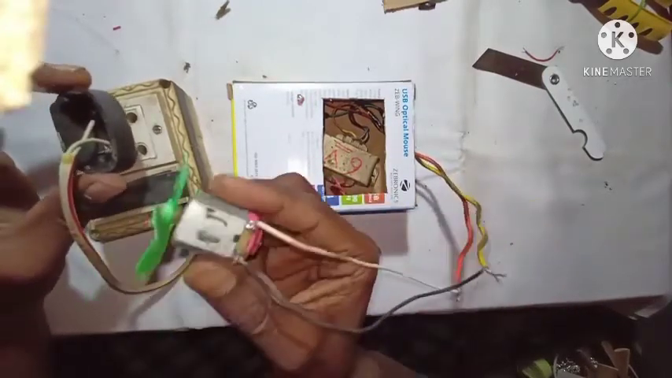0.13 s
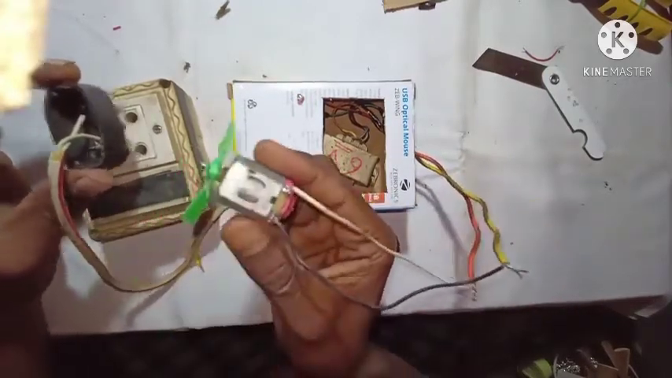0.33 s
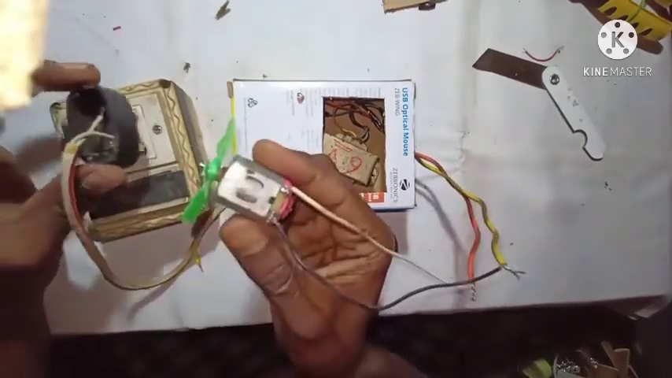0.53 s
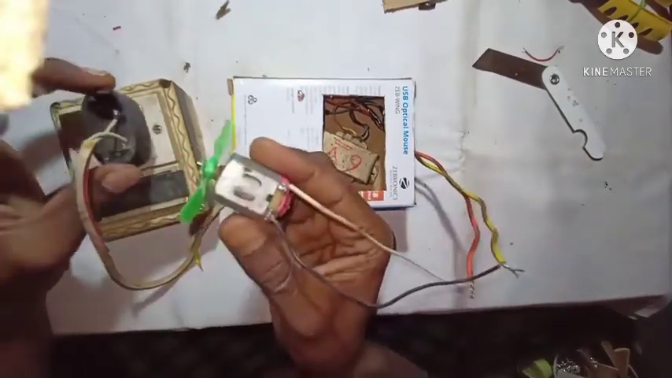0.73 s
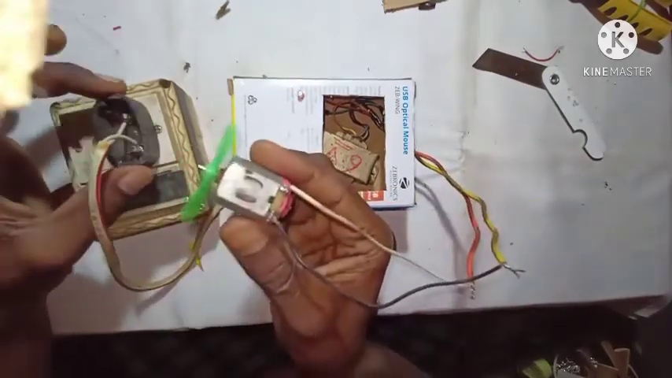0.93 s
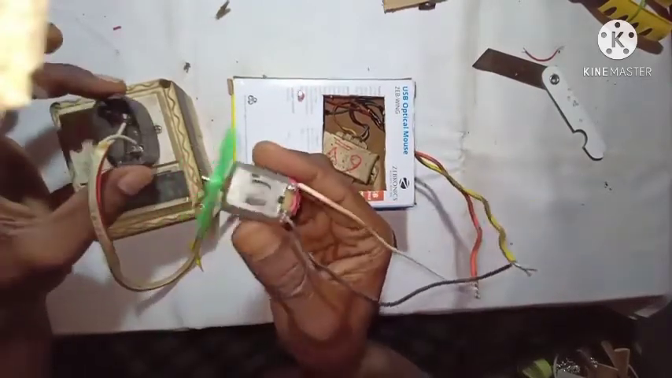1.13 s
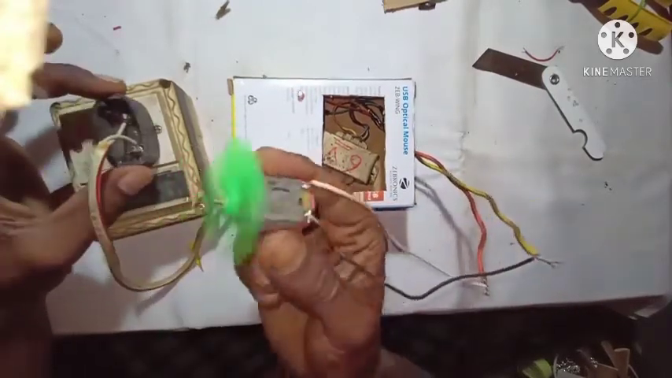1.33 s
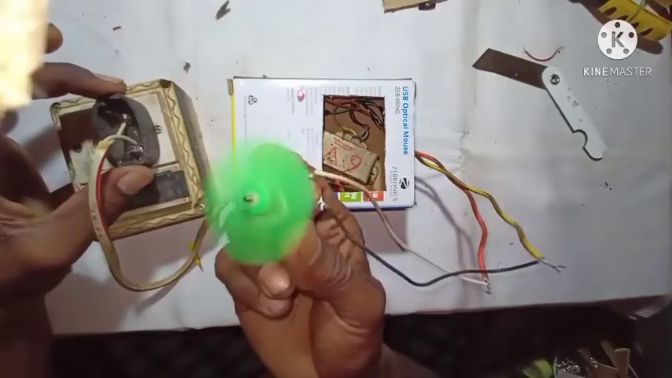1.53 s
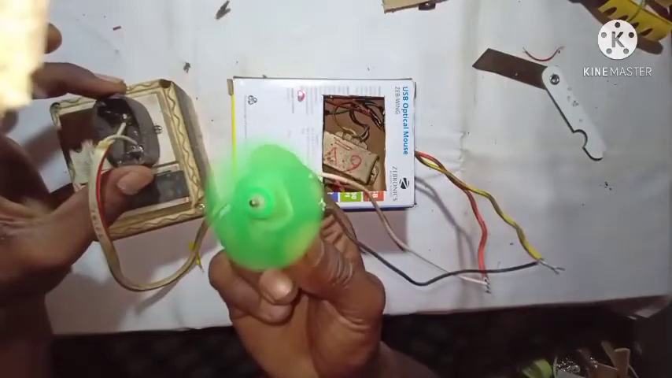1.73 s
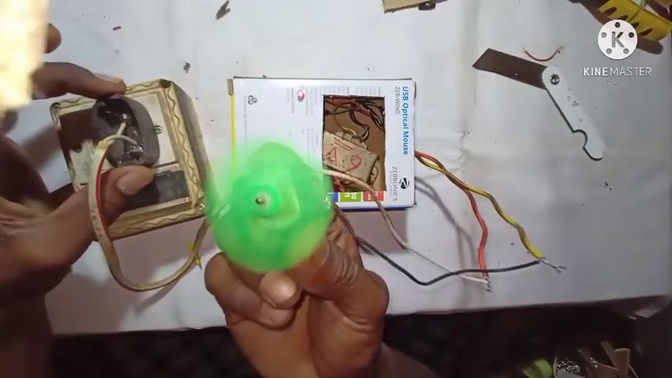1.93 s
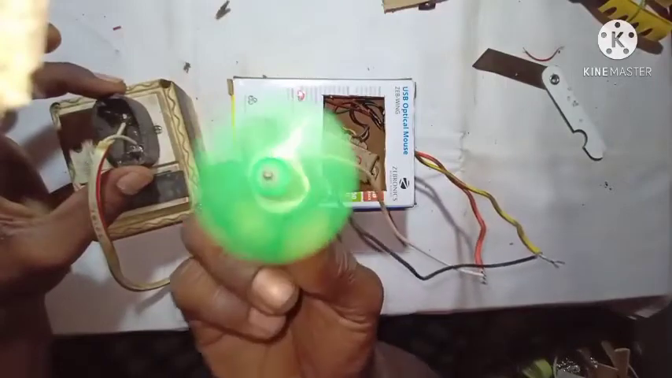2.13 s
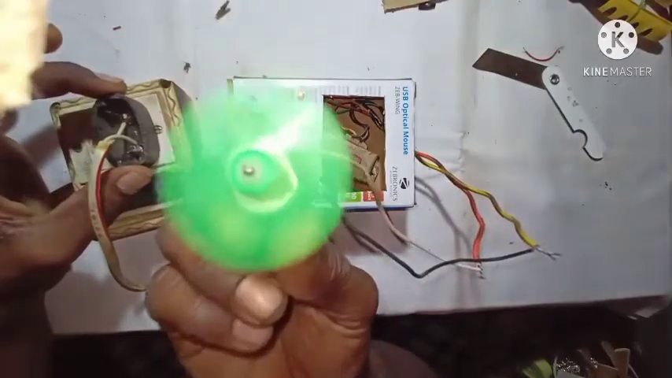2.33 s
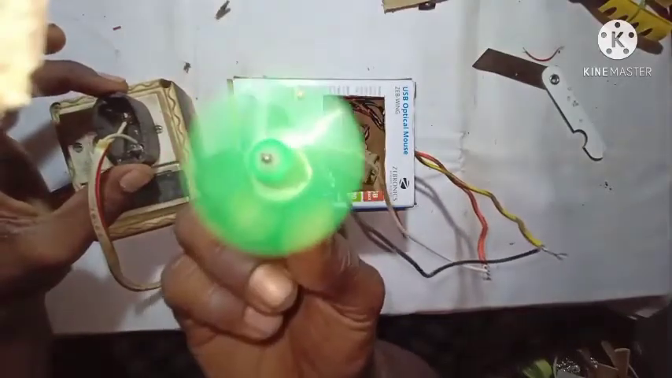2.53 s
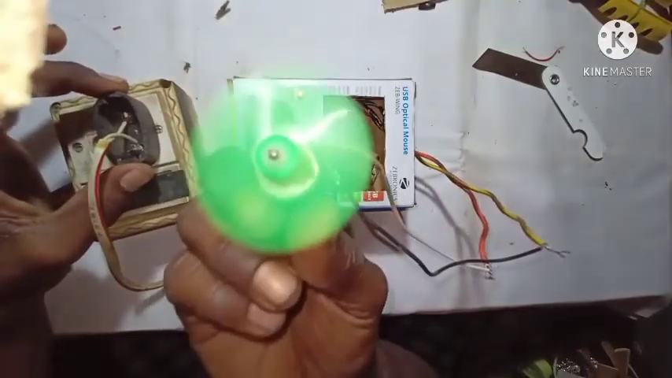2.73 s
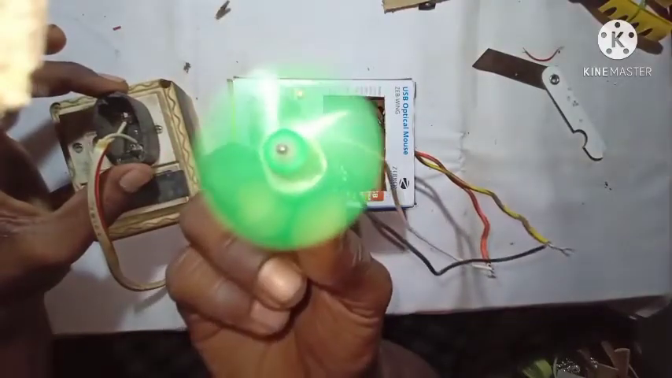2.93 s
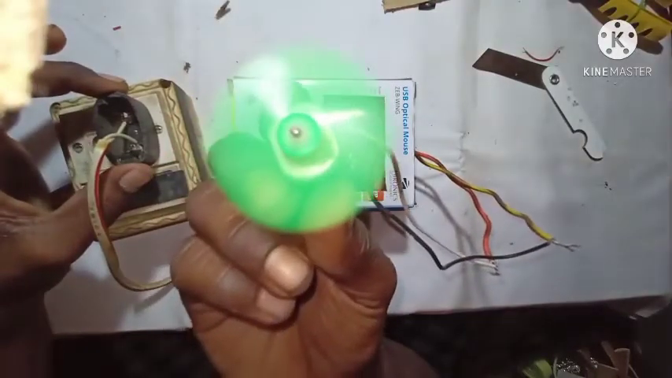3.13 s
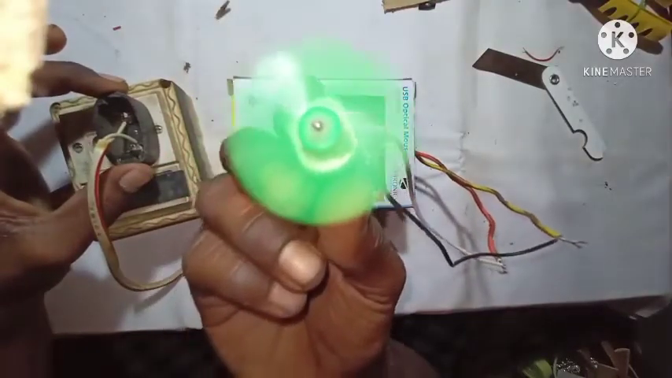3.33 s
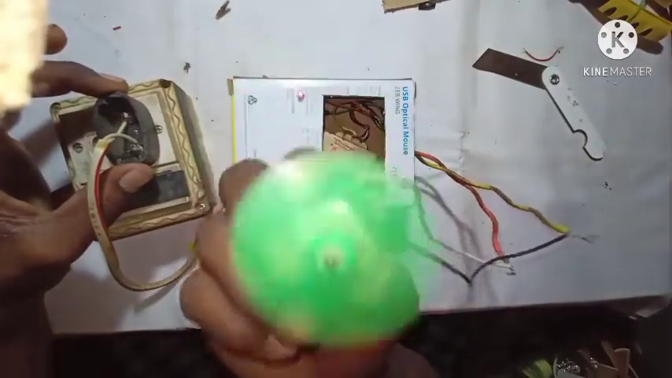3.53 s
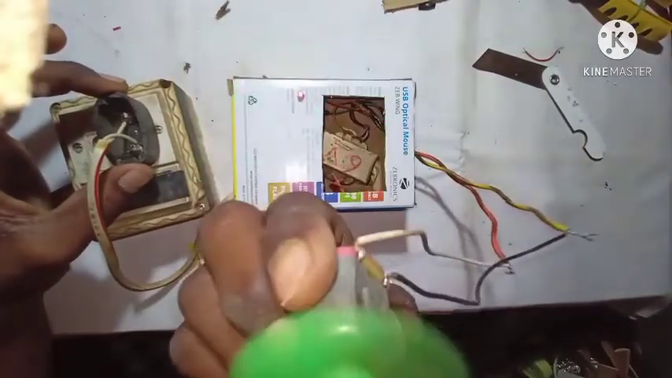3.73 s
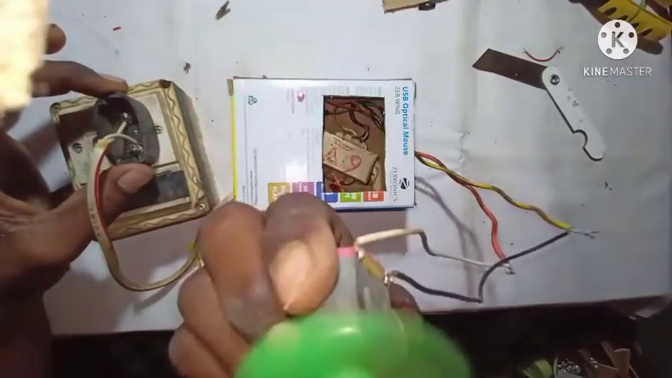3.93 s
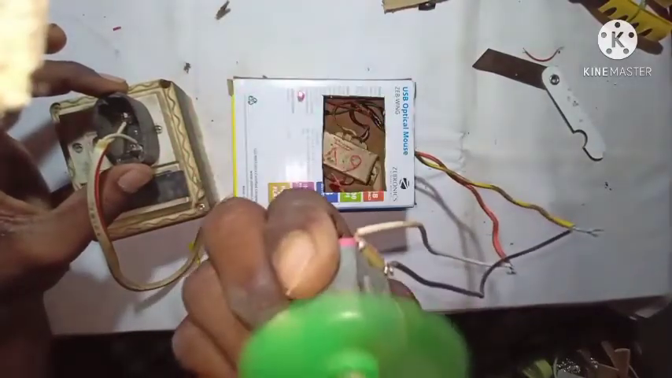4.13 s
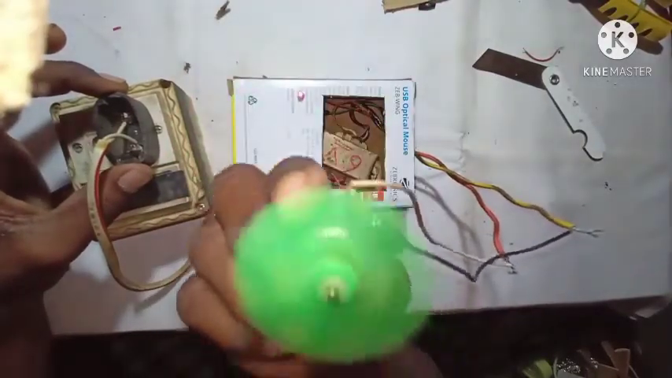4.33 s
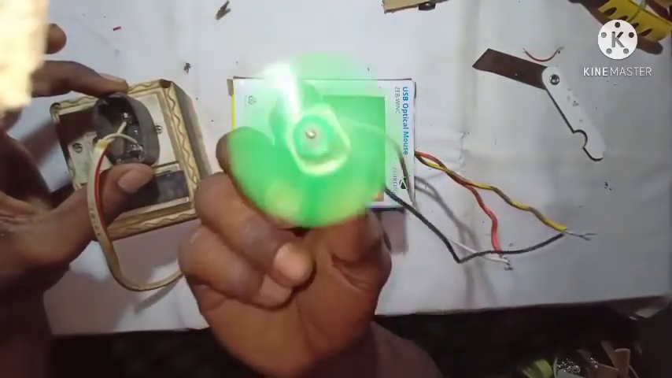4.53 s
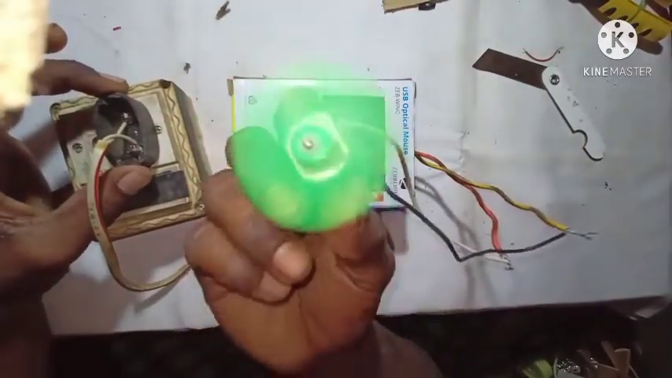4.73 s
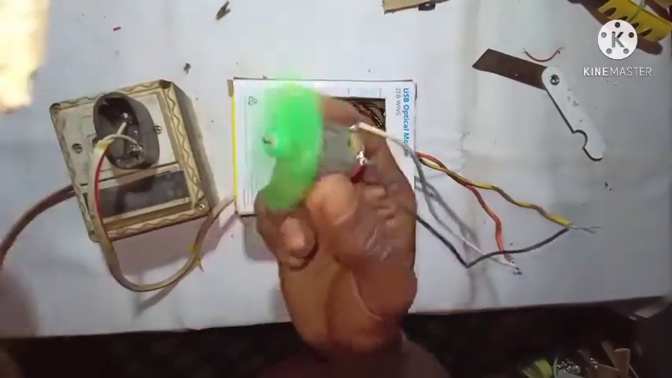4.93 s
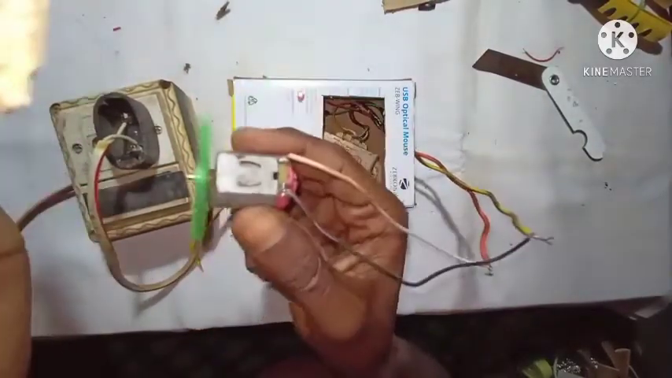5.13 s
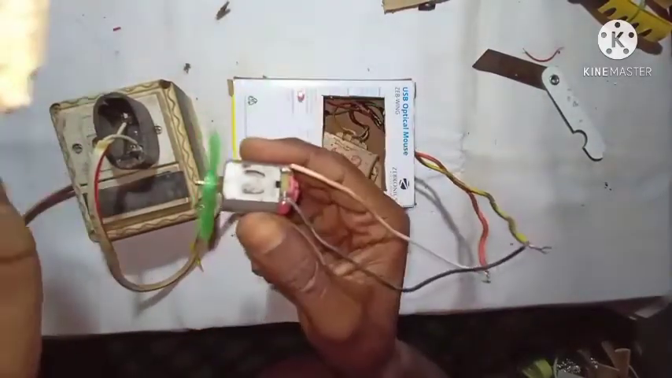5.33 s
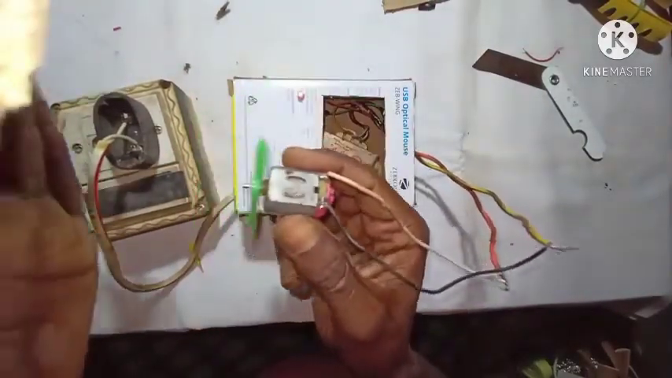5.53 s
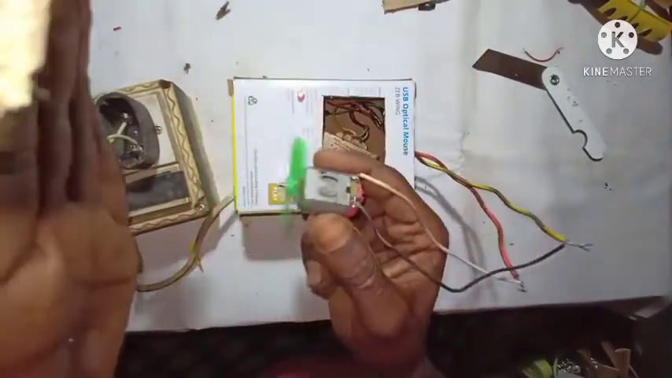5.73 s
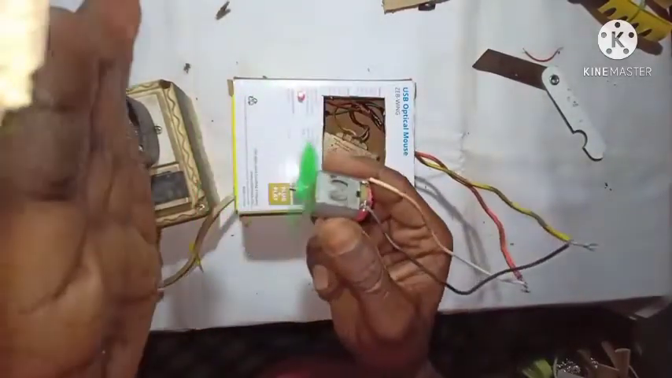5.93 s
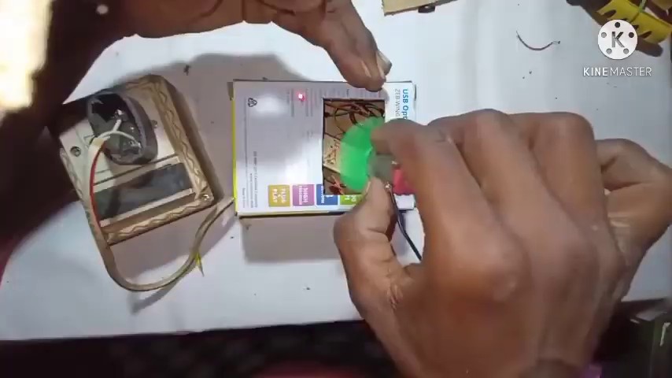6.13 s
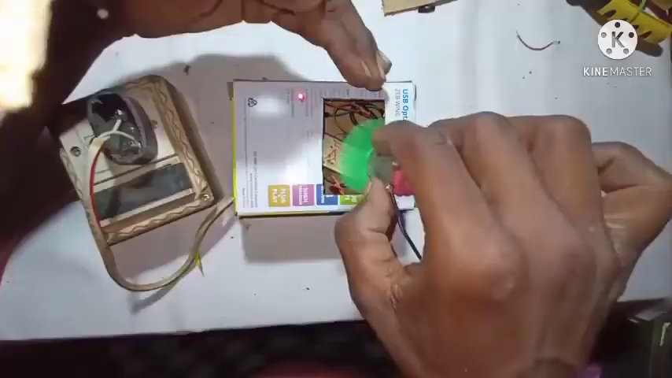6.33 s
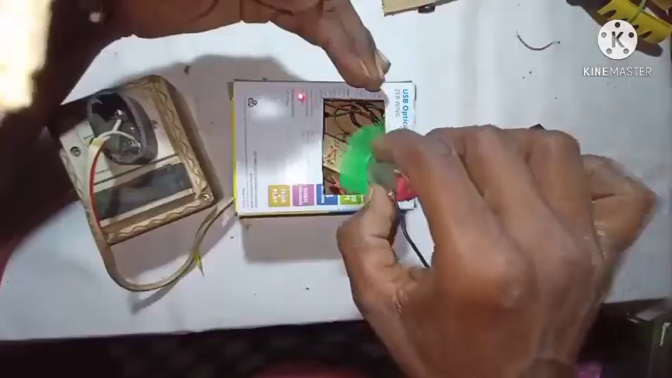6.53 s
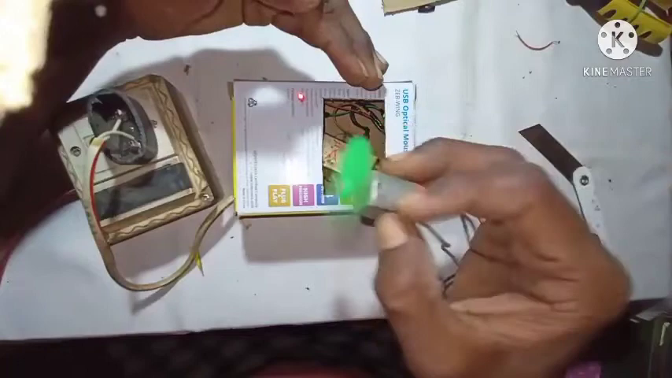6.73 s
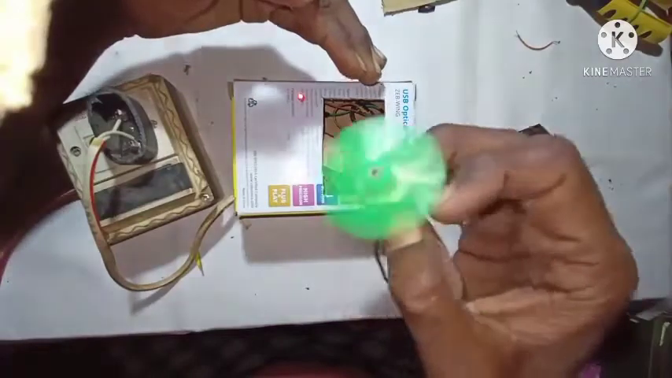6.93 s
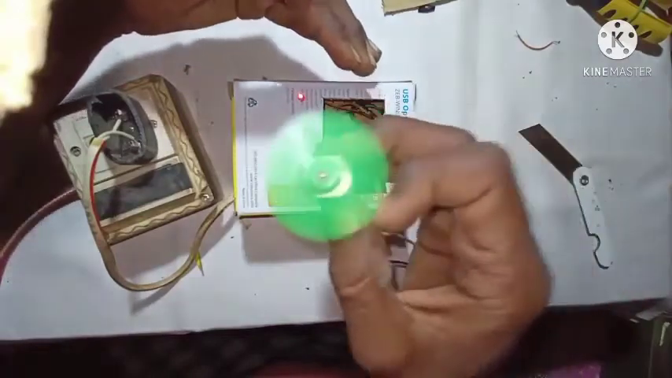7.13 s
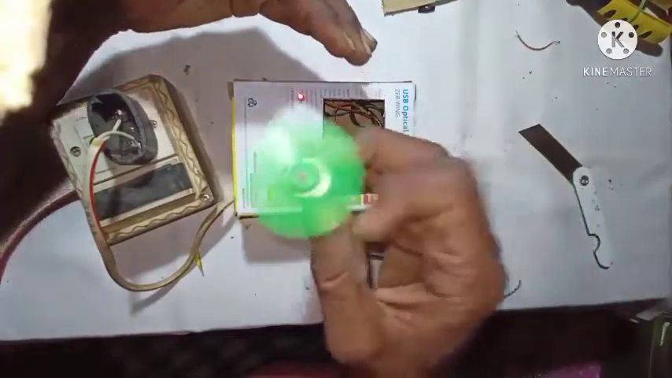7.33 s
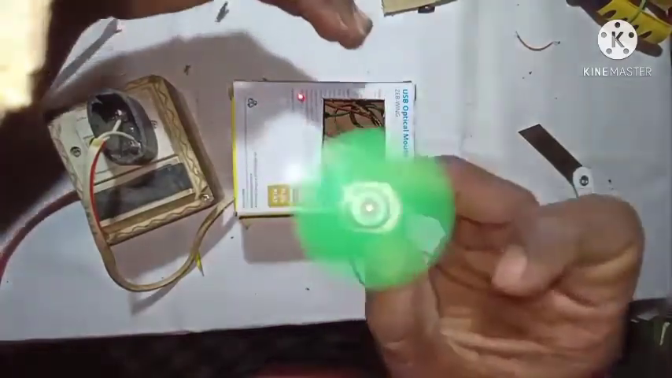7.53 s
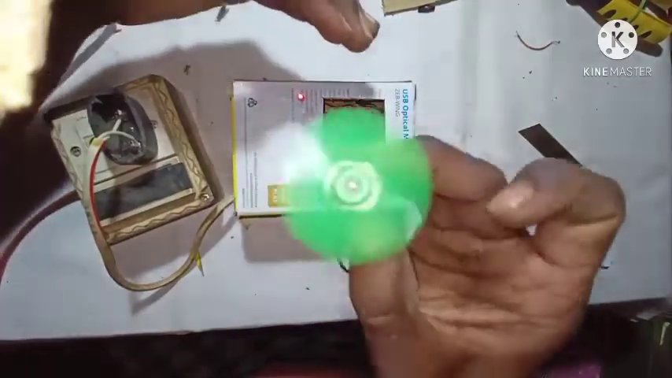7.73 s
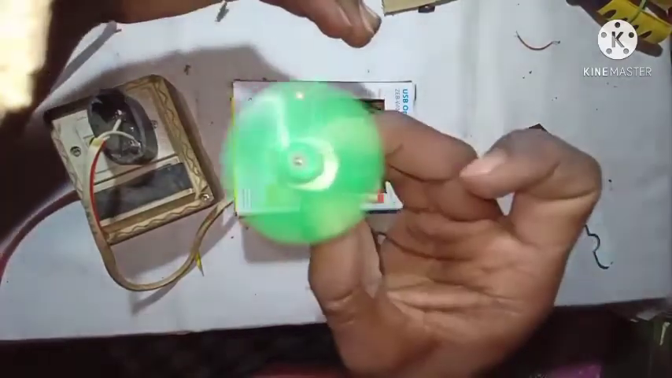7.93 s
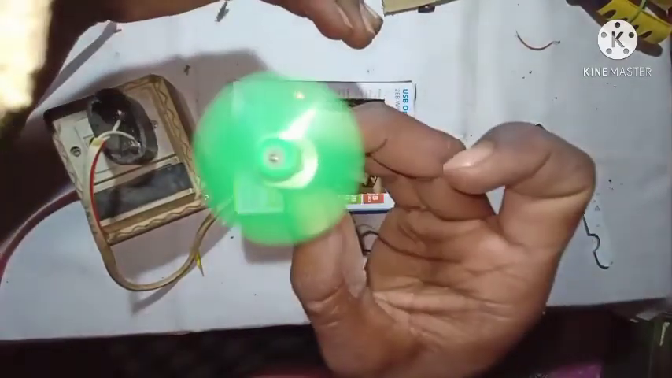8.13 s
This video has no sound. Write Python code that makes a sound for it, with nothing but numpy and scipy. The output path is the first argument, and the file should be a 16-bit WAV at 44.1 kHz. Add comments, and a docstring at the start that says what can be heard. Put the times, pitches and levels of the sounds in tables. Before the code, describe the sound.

A wire clicks into contact and a little fan motor starts whirring indoors, with hissing rasp, shifting pitch and soft air puffs.

```python
"""Dry ticks in a quiet room: a wire touches the supply and a small hand-held DC motor spins up.
Its brushes rasp on the commutator and ring the steel can, while the plastic fan stirs a draught
that now and then puffs against the microphone. The fan slips on its shaft, so the two tones beat
and the hub rubs, until it is pushed home and whines cleanly, grazed and briefly checked by a finger."""
import sys
import numpy as np
from scipy import signal
from scipy.fft import rfft, irfft, next_fast_len
from scipy.io import wavfile
from scipy.ndimage import map_coordinates

SR = 44100
rng = np.random.default_rng(int(sys.argv[2]) if len(sys.argv) > 2 else 0)


def unload_wav(signal):
    """Save mono or channel-first audio to the path in sys.argv[1] as 16-bit WAV at rate SR, clipped to [-1, 1]."""
    wavfile.write(
        sys.argv[1],
        SR,
        np.round(np.clip(np.atleast_2d(signal).T, -1, 1) * 32767).astype(np.int16),
    )


N = 361619


def amp(db):
    """Decibels to gain."""
    return 10 ** (np.asarray(db) / 20)


def unit(x):
    """Scale to rms 1."""
    return x / np.sqrt(np.mean(x ** 2) + 1e-20)


def clock():
    """The time of every sample, in seconds."""
    return np.arange(N) / SR


def along(points, hz):
    """Read (Hz, value) points on a log frequency axis."""
    freqs, values = np.transpose(points)
    return np.interp(np.log(hz + 1), np.log(freqs + 1), values)


def curve(points):
    """An automation line through (time, value) points."""
    return np.interp(clock(), *np.transpose(points))


def after(s, rise):
    """A ramp from 0 to 1 that starts at s."""
    return np.clip((clock() - s) / rise, 0, 1)


def swell(s, db, half_length):
    """A Gaussian envelope that peaks at time s."""
    return amp(db) * np.exp(-((clock() - s) / half_length) ** 2)


def wobble(rate):
    """A smooth random curve, rate knots a second."""
    return map_coordinates(rng.standard_normal(int(N * rate / SR) + 4), [clock() * rate])


def filtered(x, response):
    """x through an EQ given as gain against frequency."""
    size = next_fast_len(N + SR // 2)
    return irfft(rfft(x, size) * response(np.fft.rfftfreq(size, 1 / SR)), size)[..., :N]


def noise(spectrum):
    """Coloured noise of rms 1."""
    return unit(filtered(rng.standard_normal(N), lambda hz: amp(along(spectrum, hz))))


def bell(hz, centre, width):
    """The shape of one resonance, top 1."""
    return 1 / (1 + (2 * (hz - centre) / width) ** 2)


def band(x, lo_hz, hi_hz):
    """The part of x between two soft edges."""
    return filtered(x, lambda hz: 1 / (1 + (hz / hi_hz) ** 10) - 1 / (1 + (hz / lo_hz) ** 10))


def resonate(x, modes):
    """x through resonances and notches."""
    return filtered(x, lambda hz: amp(sum(db * bell(hz, centre, width) for centre, width, db in modes)))


# colour of the quiet room: (frequency [Hz], level [dB])
ROOM_TONE_EQ = [(15, -39), (25, -3), (33, -7), (82, -19), (204, 0.5), (246, -7), (399, -7), (1240, -16),
                (1620, -17), (2850, -24), (15500, -26)]


def room_tone():
    """A faint, dark bed of steady noise."""
    return amp(-83.5) * noise(ROOM_TONE_EQ)


# wire contacts and finger taps: (time [s], snap [dB], clack [dB], thump [dB])
CONTACTS = [(.658, -45, -52, -58), (.67, -47.5, -58, -60), (.907, -45, -49, -60), (.928, -66, -59, -52),
            (.952, -63, -50, -47), (0.969, -62, -41.5, -47), (1.015, -61, -42, -38),
            (1.032, -44, -32.5, -46), (7.392, -46, -56, -72), (7.403, -39.5, -48, -68)]
# colours of the bright snap and the hollow clack: (frequency [Hz], level [dB])
SNAP_EQ = [(100, -28), (700, -17), (1200, 2), (1800, -6), (2300, -3), (2650, 1.5), (3050, 1), (3800, -8.5),
           (8000, -5.5), (15000, -15.5)]
CLACK_EQ = [(100, -29), (400, -3.5), (700, -19), (1000, -4), (1300, 6), (1700, -41), (4000, -26),
            (15000, -34)]


def ticks():
    """Each contact is a dry snap, a plastic clack and a dull thump of the hand-held motor."""
    snap, clack, thump = np.zeros((3, N))
    for s, snap_db, clack_db, thump_db in CONTACTS:
        age = np.maximum(clock() - s, 0)
        snap += (age > 0) * amp(snap_db) * (amp(-60 * age / 0.012) + 0.15 * amp(-60 * age / 0.097))
        clack += (age > 0) * amp(clack_db - 60 * age / 0.032)
        thump += amp(thump_db - 60 * age / 0.083) * np.sin(2 * np.pi * 180 * age)
    return snap * noise(SNAP_EQ) + clack * noise(CLACK_EQ) + band(thump, 130, 600)


# each grip turns other parts of the motor to the microphone, with its own mix and EQ:
# (time [s], glide [s], hum [dB], blade tone [dB], fifth order [dB], brush trim [dB], spark trim [dB],
#  draught [dB], list of (centre [Hz], width [Hz], gain [dB]))
GRIPS = [ (0, 0, -55.5, -60, -73, 1.54, -.7, -62.5, [(1750, 260, 1.5), (3600, 340, 2.5), (5700, 460, 1.5),
         (4900, 970, -4.5), (8600, 790, -3), (9800, 960, 3.5), (11500, 570, -5), (12400, 320, 5)]),
         (2.17, 0.3, -51, -63.5, -72, -.5, -1.5, -61.5, [(2193, 540, -3), (4560, 320, -5),
         (15000, 900, 4)]), (3.7, 0.41, -46.5, -59, -67, -0.16, -1, -62.5, [(2120, 650, -5.5),
         (11300, 800, 3), (12100, 440, 2)]), (4.5, 0.3, -51, -59, -71, 0.6, -2, -60.5, [(6460, 470, -3.5),
         (12000, 600, 3.5)]), (4.94, 0.18, -57, -60, -69, 1.1, 0.6, -60.5, [(3450, 450, 3.5),
         (4870, 380, -4), (12400, 600, 3)]),
         (5.25, 0.39, -50.5, -72.5, -69, -0.6, -1.5, -58.5, [(1510, 280, -6), (2920, 170, -6),
         (3540, 200, 7.5), (4930, 380, -4.5), (5800, 560, 2), (12600, 900, -0.5)]),
         (6.2, 0.17, -45.1, -76, -64, -3.8, 4, -65, [(925, 780, 7), (1500, 490, -6), (2178, 290, 5.5),
         (4900, 1050, -5.5), (6144, 700, 5), (11900, 940, -7)]),
         (6.84, 0.44, -47.3, -53, -59.5, -1.2, 3, -67, [(2690, 870, -4), (4200, 460, 5.5), (5000, 420, -3),
         (7100, 1500, 2.5), (8760, 540, -3), (12250, 410, -2)]),
         (7.24, 0.13, -49, -53.5, -52, -1, 2.5, -65.5, [(1800, 500, -3), (2750, 760, -5.5), (4240, 470, 3),
         (5000, 470, -4), (8800, 540, -3), (12250, 410, 4)]),
         (7.45, 0.051, -45.5, -53, -66.5, -0.64, 0.7, -65.5, [(2500, 1160, -5), (4140, 590, 3.5),
         (9670, 600, 4)]), ]


def glide(values):
    """Crossfade one value or sound per grip as the hand turns the motor."""
    blend = values[0]
    for (s, length, *_), value in zip(GRIPS[1:], values[1:]):
        share = after(s - length / 2, length)
        blend = (1 - share) * blend + share * value
    return blend


POWER_ON_S, STALL_SHARE = .907, 0.21  # current flows; share of the drive left at standstill
RATTLE_DB, HISS_DB, FIZZ_DB = -54, -48.5, -46  # at cruising speed, before the trims
# colour of the raw brush scrape: (frequency [Hz], level [dB])
SCRAPE_EQ = [(120, -18), (250, -3), (500, -0.5), (900, -1), (2200, 1.5), (5000, 1), (9000, -1), (15500, 7)]
# resonances of the steel can: (centre [Hz], width [Hz], gain [dB])
CAN_MODES = [(937, 120, 3.5), (1587, 400, 6.5), (2525, 430, 3), (3270, 470, 6.5), (3960, 920, 4),
             (5594, 410, 5.5), (6840, 170, 3), (7610, 700, 5), (9450, 550, 2), (10620, 320, 2.5),
             (12130, 520, 6), (14840, 770, 7.5)]


def brushes(shaft_angle, pace, brush_db, spark_db):
    """Two brushes scrape and spark over three commutator bars and ring the can; faster is louder."""
    drive = abs(STALL_SHARE + (1 - STALL_SHARE) * pace ** 3.13)
    gaps = np.cos(6 * shaft_angle)  # six gaps a turn
    pressure = amp(2.36 * gaps + 1.5 * np.cos(shaft_angle) + 0.69 * wobble(700) + 0.52 * wobble(25))
    scrape = filtered(pressure * rng.standard_normal(N), lambda hz: amp(along(SCRAPE_EQ, hz)))
    can = resonate(scrape, CAN_MODES)
    held = glide([resonate(can, grip_eq) for *_, grip_eq in GRIPS])
    rattle = amp(RATTLE_DB) * drive ** 0.75 * unit(band(held, 100, 2870))
    hiss = amp(HISS_DB) * drive * unit(band(held, 3104, 9130))
    fizz = amp(FIZZ_DB + spark_db) * drive * unit(band(held, 8760, 15600))
    return (rattle + hiss + fizz) * amp(brush_db + finger_dip_db()) * after(POWER_ON_S, rise=0.018)


def table_reflection(x, delay_s=0.000896, level_db=-14.5):
    """A bounce off the table top; its delay sways with the hand and sweeps a faint comb."""
    delay = delay_s * (1 + .1 * wobble(1.486))
    return amp(level_db) * map_coordinates(x, [(clock() - delay) * SR])


CRUISE_HZ, PUSHED_HOME_S = 380, 6.185
# fan speed while it slips, and once seated: (time [s], rotation [Hz])
LOOSE_SPEED = [(1.5, 379.4), (1.8, 367.9), (2.17, 360.8), (2.32, 339.4), (2.58, 336.8), (2.9, 326.7),
               (3.3, 325.0), (3.6, 317.5), (3.82, 346.8), (4.25, 353.0), (4.87, 348.3), (5.27, 399.7),
               (5.65, 397.7), (6.15, 402.3)]
SEATED_SPEED = [(6.22, 440.6), (6.65, 443.7), (6.92, 384), (7.19, 368), (7.29, 383.3), (7.38, 378.2),
                (7.42, 332.7), (7.55, 381.6), (7.68, 400.4), (7.83, 383), (8.02, 377.7), (8.18, 367.4)]
# how much faster the shaft turns than the loose fan: (time [s], slip [Hz])
SHAFT_SLIP = [(1.1, 90), (1.35, 60), (1.47, 14), (2, 14.5), (2.15, 7.3), (2.6, 8), (3, 9.6), (3.35, 7.3),
              (3.55, 9), (3.68, 25.5), (3.85, 17), (4.33, 17), (4.45, 12), (4.85, 19), (5.05, 56),
              (6.17, 49)]


def rotation():
    """The fan's pace (1 at cruising speed), its angle and the shaft's lead over it, both in radians."""
    seated = after(PUSHED_HOME_S, rise=0.0053)
    spin_up = 1 - (1 - after(.97, rise=.52)) ** 2.7  # gathers speed quickly at first
    fan_hz = (1 - seated) * spin_up * curve(LOOSE_SPEED) + seated * curve(SEATED_SPEED)
    fan_hz *= 1 + 0.00091 * wobble(45)
    lead_turns = np.cumsum(curve(SHAFT_SLIP) * (1 - seated)) / SR
    lead_turns -= np.interp(2.995, clock(), lead_turns)  # one rub of the hub peaks at this time
    return fan_hz / CRUISE_HZ, 2 * np.pi * np.cumsum(fan_hz) / SR, 2 * np.pi * lead_turns


# the jet sweeps across the microphone: (time [s], level [dB], half length [s])
PUFFS = [(1.385, -45, 0.0097), (1.457, -46.5, 0.019), (1.505, -50, 0.016), (5.163, -48, 0.015),
         (5.211, -44, 0.029), (5.271, -54, 0.019), (6.943, -60, 0.017), (7, -48.5, 0.018)]
# colours of the running draught and of the puffs: (frequency [Hz], level [dB])
DRAUGHT_EQ = [(20, -17), (50, -23.5), (85, -13), (125, 1.5), (190, 1), (300, 0.5), (500, -5), (1200, -40),
              (4000, -80)]
PUFF_EQ = [(20, -24), (45, -31), (75, -8), (140, 3.5), (210, 1.5), (300, -2.5), (500, -16), (1200, -38),
           (4000, -80)]


def draught(pace, air_db):
    """The blades stir a rumble that grows with speed, with deeper puffs as their jet hits the mic."""
    rumble = amp(air_db + wobble(9.8)) * pace * noise(DRAUGHT_EQ)
    gusts = sum(swell(*puff) for puff in PUFFS)
    return rumble + gusts * noise(PUFF_EQ)


def orders(angle, levels, flutter_db, rocking=0):
    """Sines at multiples of a rotation; a rocking hub favours odd and even overtones in turn."""
    tone = np.zeros(N)
    for order, db in levels:
        sway = amp(flutter_db * wobble(30)) * (1 - (-1) ** order * rocking) if order > 1 else 1
        tone += np.sqrt(2) * amp(db) * sway * np.sin(order * angle + rng.uniform(0, 2 * np.pi))
    return tone


def hub_rub(lead, looseness):
    """The hub rubs once for every turn the shaft gains; the tighter it binds, the harder it rubs."""
    contact = ((1 + np.cos(lead)) / 2) ** 2
    white = rng.standard_normal(N)
    friction = unit(filtered(white, lambda hz: bell(hz, 5550, 800) + .4 * bell(hz, 3200, 700) + .07))
    return amp(-50.3 - 6.5 * looseness) * contact * friction


def loose_fan(angle, lead, pace, hum_db, blade_db, fifth_db, tight_slip_hz=8.5):
    """The shaft sings just above the slipping fan, so they beat while the hub rocks and rubs."""
    looseness = np.log2(curve(SHAFT_SLIP) / tight_slip_hz)
    # both levels settle at a limit when the hub runs free
    second_db = np.minimum(-71 + 8 * looseness, -64.5)
    shaft_db = np.maximum(-56.5 - 11.5 * looseness, -72.5)
    rocking = .85 * np.cos(lead - 2.1)
    hum = orders(angle, [(1, hum_db)], flutter_db=0) * (1 + .19 * rocking)
    blades = orders(angle, [(2, second_db), (3, blade_db), (5, fifth_db)], flutter_db=.7, rocking=rocking)
    shaft_levels = [(2, np.minimum(blade_db - 2, shaft_db + 3.3)), (3, shaft_db),
                    (4, shaft_db - 7.5), (5, shaft_db - 12)]
    shaft = orders(angle + lead + .07 * wobble(40), shaft_levels, flutter_db=1, rocking=.35 * rocking)
    sound = hum + pace ** 3 * blades + shaft + hub_rub(lead, looseness)
    return sound * after(1.06, rise=0.077) * (1 - after(PUSHED_HOME_S - .015, rise=0.012))


# a finger checks the motor: (time [s], dip [dB], recovery [s])
FINGER_CHECKS = [(6.184, 8.5, 0.13), (7.428, 2, 0.076)]


def finger_dip_db(attack_s=0.028):
    """The level ducks under a checking finger: a quick fall and a straight recovery."""
    return -sum(db * (after(s - attack_s, attack_s) - after(s, recovery))
                for s, db, recovery in FINGER_CHECKS)


def seated_fan(angle, pace, hum_db, blade_db, fifth_db):
    """Unbalance hums once a turn and the blades add clean overtones; orders 1-3 duck under a finger."""
    speed_db = 26.5 * np.log2(np.maximum(pace, .5))  # hum and high orders grow with speed
    dip_db = finger_dip_db()
    levels = [hum_db + speed_db + dip_db / 2, -59 + dip_db, blade_db + 3.1 * dip_db,
              -65.5 + speed_db, fifth_db + speed_db, fifth_db - 8.5 + speed_db]
    return orders(angle, enumerate(levels, 1), flutter_db=2.0) * after(PUSHED_HOME_S, rise=0.028)


# a finger grazes the fan: (time [s], level [dB], half length [s], centre [Hz], width [Hz])
FINGER_GRAZES = [(6.787, -52.5, 0.11, 880, 260), (7.401, -43.5, 0.013, 7500, 7000)]


def grazes():
    """Skin scuffs the spinning plastic: short swells of rough noise."""
    sound = np.zeros(N)
    for s, db, half_length, centre, width in FINGER_GRAZES:
        scuff = unit(filtered(rng.standard_normal(N), lambda hz: bell(hz, centre, width)))
        sound += swell(s, db, half_length) * scuff
    return sound


# the room's decay: (frequency [Hz], time to fall 60 dB [s])
ROOM_DECAY = [(200, 0.56), (2000, 0.14), (12000, 0.11)]


def reverb(x):
    """A short room tail whose treble dies first."""
    hz, age, spectra = signal.stft(rng.standard_normal(SR // 2), SR, nperseg=256)
    decay = amp(-60 * age / along(ROOM_DECAY, hz)[:, None])
    tail = signal.istft(spectra * decay, SR, nperseg=256)[1]
    return signal.fftconvolve(x, tail / np.linalg.norm(tail))[:N]


def scene():
    """Contacts, motor and fan over the quiet room, alike in both channels."""
    pace, angle, lead = rotation()
    _, _, *faders, _ = zip(*GRIPS)
    *tones_db, brush_db, spark_db, air_db = [glide(fader) for fader in faders]
    whine = loose_fan(angle, lead, pace, *tones_db) + seated_fan(angle, pace, *tones_db)
    rasp = brushes(angle + lead, pace, brush_db, spark_db)
    clatter = rasp + table_reflection(rasp) + ticks() + grazes()
    tail = reverb(amp(-26) * whine + amp(-13) * clatter)
    mono = whine + clatter + tail + draught(pace, air_db) + room_tone()
    return np.array([mono, mono])


def record(dry):
    """A brick-wall low-pass takes off the top of the treble."""
    return filtered(dry, lambda hz: hz < 15550)


dry = scene()
out = record(dry)
unload_wav(out)
```